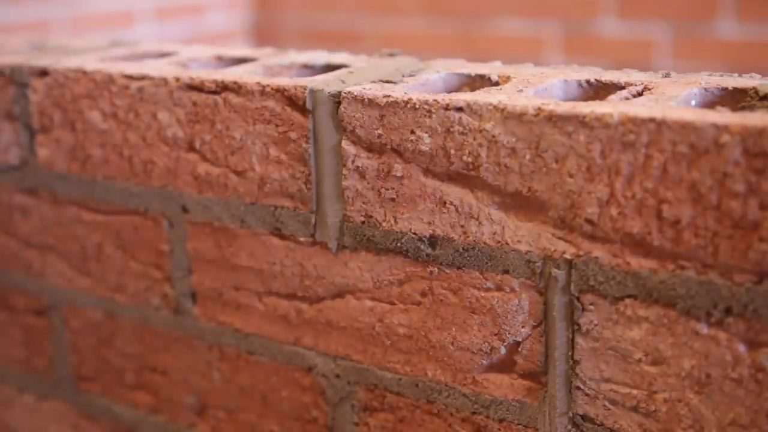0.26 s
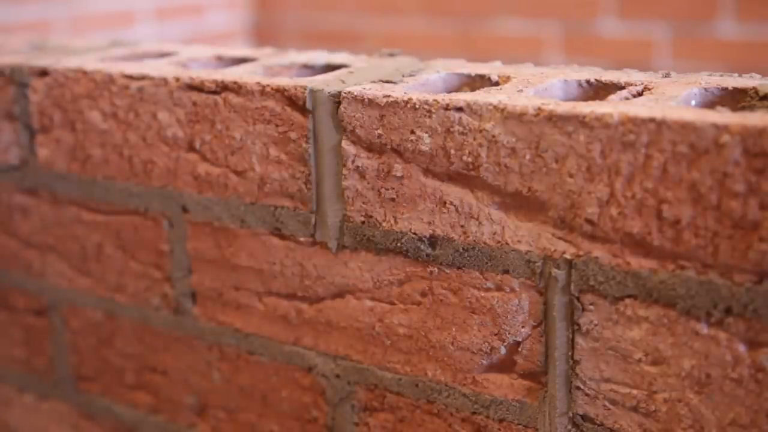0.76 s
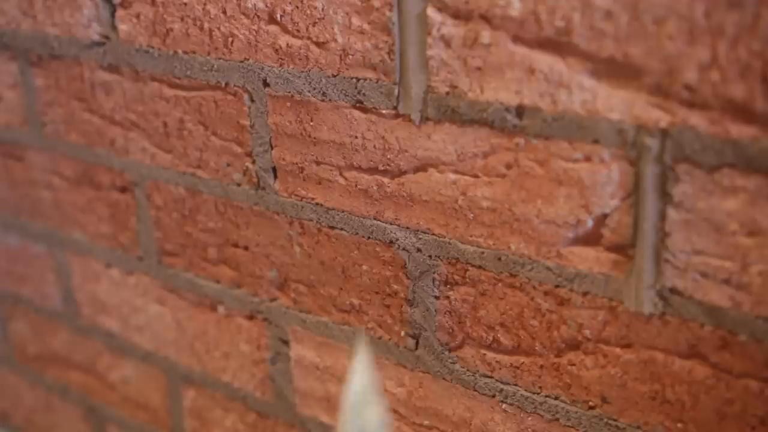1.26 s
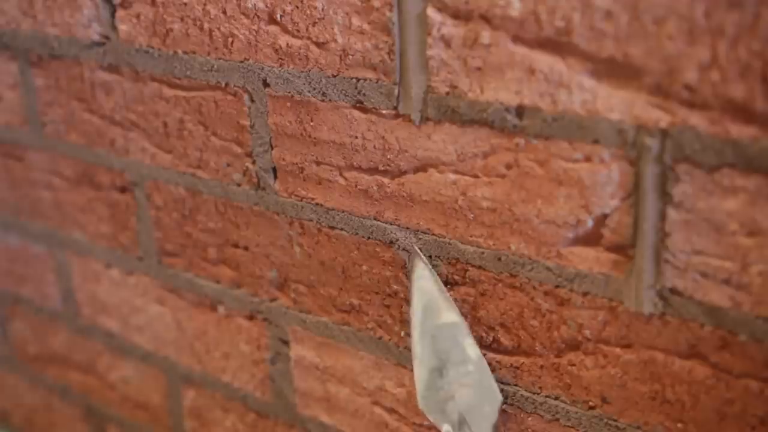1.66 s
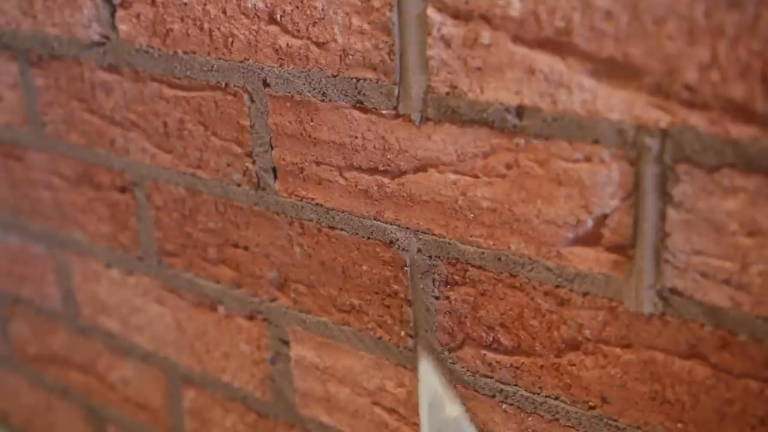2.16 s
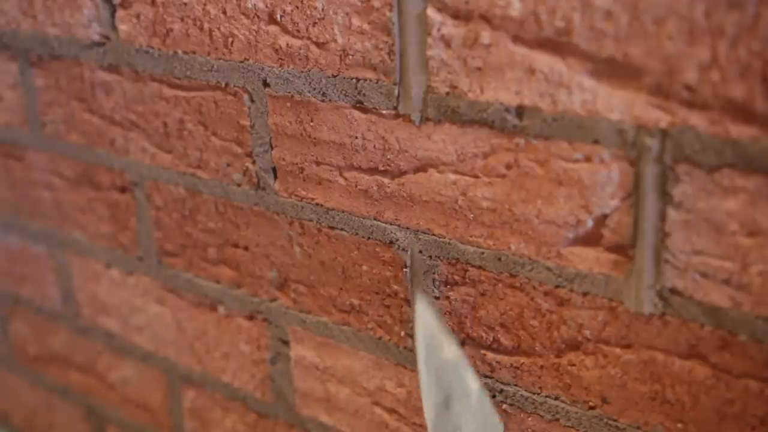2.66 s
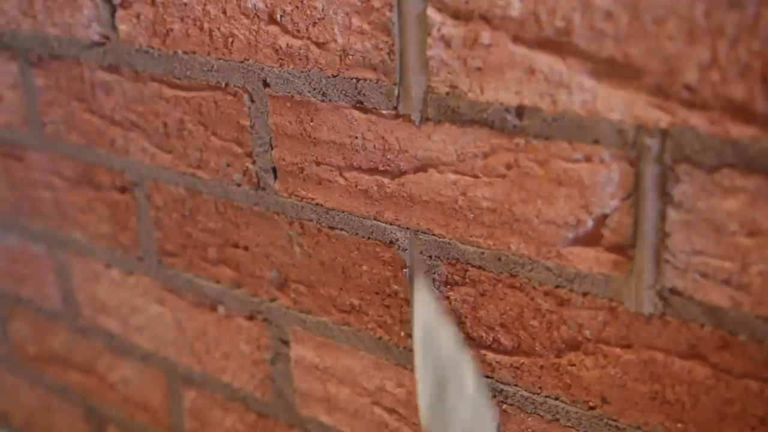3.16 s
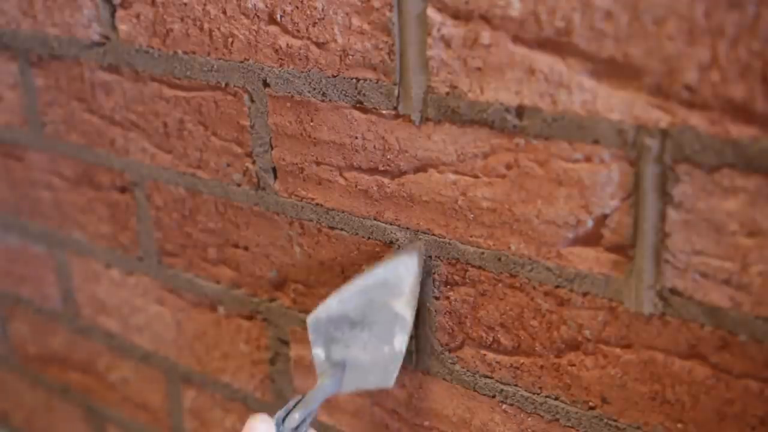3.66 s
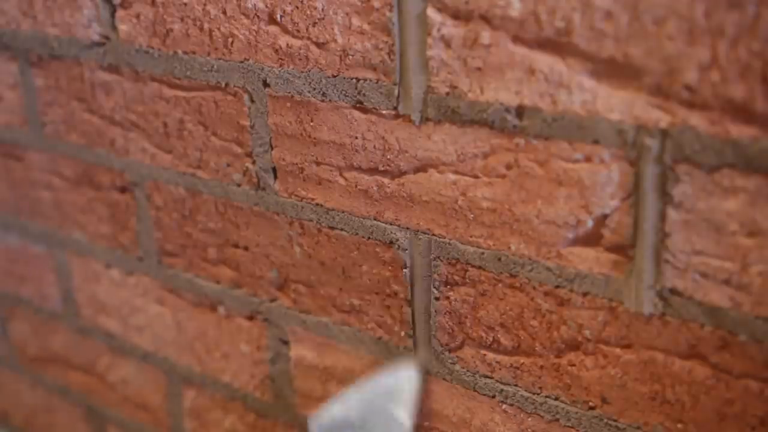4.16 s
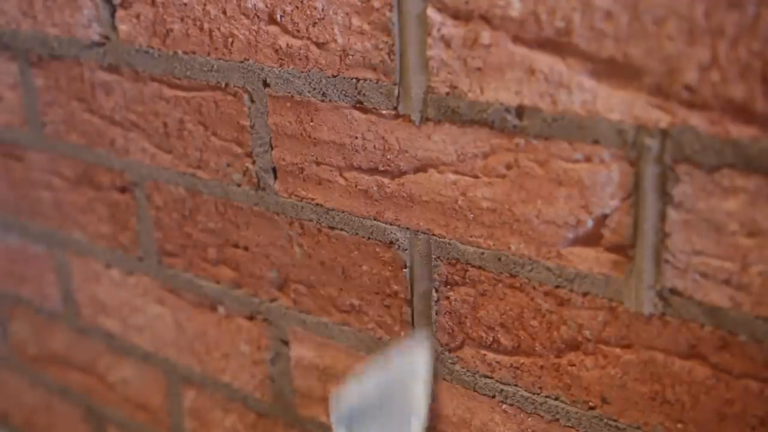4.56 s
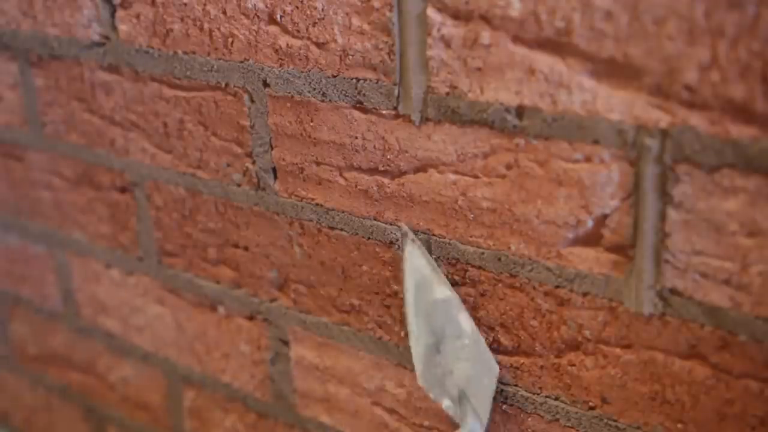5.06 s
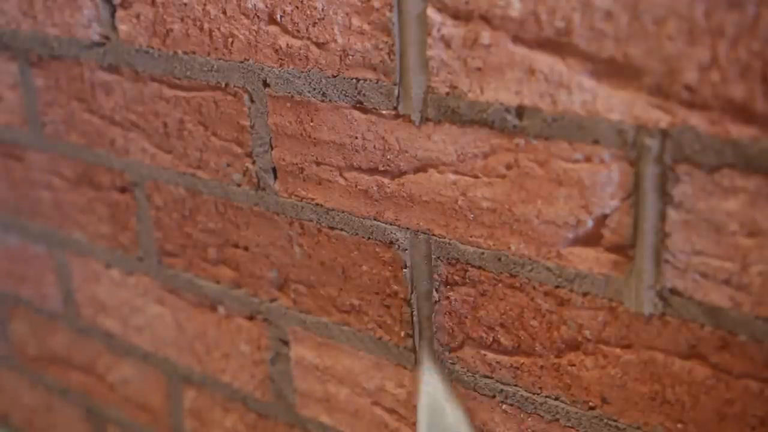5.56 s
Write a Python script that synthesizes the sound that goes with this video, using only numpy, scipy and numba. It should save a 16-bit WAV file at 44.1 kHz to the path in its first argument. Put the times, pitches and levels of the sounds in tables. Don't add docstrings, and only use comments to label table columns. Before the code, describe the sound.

Quiet, steady outdoor air with a very faint wavering engine hum runs throughout, wide in stereo. A sleeve rustles softly from 0.1 to 0.58 s. At 0.6 s a steel trowel taps a brick: a short hard clack with a dull thud, metallic ring and three rapid fading bounces until about 0.7 s. Crunchy crumbs tick from 0.74 to 1.4 s, with a faint distant metal clink and more cloth near 1.2 s. Six close scrapes follow, bright and sandy with thin steel ringing: 1.9-2.3 s, soft, swelling and fading, with two crumb ticks; 2.55-2.9 s, growing to a knock; 3.15-3.35 s, short, landing sharply and fading; 3.85-4.23 s, smoother and softer; 4.48-4.7 s, strongest, with rattling landing, snags and a loud clink near 4.69; 5.23-5.53 s, moderate, ending on a small rattle. Gaps hold only quiet air; the brick walls add a faint short tail.

```python
import sys
import numpy as np
from scipy import signal
from scipy.fft import rfft, irfft, next_fast_len
from scipy.io import wavfile
from numba import njit

SR = 44100
rng = np.random.default_rng(int(sys.argv[2]) if len(sys.argv) > 2 else 0)


def boost(x):
    u = np.asarray(x, float) / 20
    return 10 ** u


def transcribe(signal):
    frames = np.atleast_2d(signal).T
    limited = np.clip(frames, -1, 1)
    pcm = np.round(limited * 32767).astype(np.int16)
    wavfile.write(sys.argv[1], SR, pcm)


N = 257103

# [f/Hz, level per Hz/dB]
AIR = [(15, -53), (25, -26), (55, -14), (97, -9.5), (137, -5.5), (229, -8.5), (335, -5.5), (416, -8),
       (451, -9.5), (624, -9), (695, -8.5), (887, -8.5), (2550, -26), (2990, -26.5), (16000, -29)]
# [f/Hz, level per Hz/dB]
AIR_SIDE = [(15, -44), (25, -8), (200, -7), (354, -3.5), (394, -16.5), (451, -3.5), (575, -6), (2690, -8.5),
            (16000, -6)]
# [t/s, f/Hz, level/dB]
MOTOR = [(0, 118, -73), (.6, 138, -58), (1.2, 126, -69.5), (2.3, 116, -61), (2.6, 138, -61.5),
         (3.3, 122, -71), (3.9, 136, -59.5), (4.6, 128, -66.5), (5.03, 131, -54.5), (5.3, 130, -57),
         (5.83, 125, -72)]
# [peak t/s, level/dB, rise/(dB per s), fall/(dB per s)]
RUSTLES = [
    (.116, -57, 80, 62.5),
    (.31, -57, 220, 21),
    (.396, -50, 112, 201),
    (0.576, -55, 91, 900),
    (1.171, -55, 1200, 57.5),
    (1.244, -56, 98, 250),
    (1.34, -65.5, 100, 46),
]
# [f/Hz, level per Hz/dB]
CLOTH = [(180, -27), (300, -3.5), (946, -4.5), (1170, -8.5), (1810, -8), (3350, -11), (9710, -17.5),
         (16000, -26)]
# [t/s, peak level/dB, f/Hz]
CRUMBS = [(0.544, -63, 1450), (0.7435, -34, 2720), (0.773, -36, 1213), (0.813, -41, 5540),
          (0.841, -41.5, 5620), (0.9064, -47, 1220), (1.071, -42, 2260), (1.318, -42, 1330),
          (1.39, -52.5, 3470), (1.9582, -37, 1170), (1.9755, -38, 4500)]
# [f/Hz, level per Hz/dB]
THUD = [(71, -59), (120, 1.5), (580, 8), (1340, 10), (1500, 10.5), (1660, -50), (2230, -26), (2500, -39),
        (3250, -55), (5500, -120)]
# (low mode/dB, second mode/dB, grit/dB, deep modes/dB)
BLOW = (-33.5, -10, -14.5, -19)
SETTLE = (-25, -23, -31.5, -35)
FIRST_BOUNCE = (-15.5, -11.5, -21, -37.5)
# (start t/s, end t/s)
BOUNCING = (.598, .695)
# [f/Hz, level/dB, free t60/s, touching t60/s, share of the stiffening]
SHANK_MODES = [(641, -9, .9, .2, 0), (1382, -5, .22, .12, 0), (3472, -6, .2, .04, 0),
               (950, -4, .05, .04, 0), (515, -6, .06, .05, 0)]
DEEP_MODES = [(1382, -10, .3, .06, 0), (641, -8, .15, .04, 0), (480, -10, .04, .03, 0),
              (880, 1, .04, .03, 0), (1100, -3, .04, .03, 0), (1800, 1, .03, .025, 0),
              (2050, 1, .03, .025, 0)]
LOW_MODES = [(2540, -6, .025, .018, 0), (2806, 0, .19, .035, 1), (3472, -33, .26, .03, 0),
             (3060, -28, .06, .04, 0), (3000, -9, .03, .025, .3), (3250, -12, .03, .02, .3)]
SECOND_MODES = [(4425, 0, .15, .06, .2), (4300, -9, .03, .025, 0), (4520, -6, .06, .04, .2)]
HIGH_MODES = [(5015, -15, .2, .03, 0), (5745, -5, .09, .022, .1), (7890, -12, .08, .01, .4),
              (9990, -11, .05, .01, 0), (5300, -4, .025, .02, .3), (7300, -7, .015, .009, .4),
              (8300, -4, .015, .008, .3), (10600, -1, .015, .008, .2), (11750, -7, .012, .006, .1),
              (14300, -16, .01, .004, .1)]
# [f/Hz, level per Hz/dB]
GRIT = [(3500, -22.5), (4800, -1.5), (5800, 5.5), (6600, -7.5), (7600, -2), (10500, -0.5), (13000, -1),
        (15800, -4)]
# (f/Hz, level/dB, t60/s)
FAR_CLINK = (3467, -51.5, 0.93)
# [touch t/s, lift t/s]
STROKES = [
    (1.875, 2.275),
    (2.556, 2.893),
    (3.144, 3.334),
    (3.845, 4.23),
    (4.475, 4.708),
    (5.23, 5.534),
]
# [t/s, f/Hz]
PRESSED = [
    [(1.875, 2805), (2.285, 2825)],
    [(2.556, 2903), (2.81, 2804), (2.85, 3023), (2.9, 3061)],
    [(3.144, 2927), (3.336, 2803)],
    [(3.845, 2803), (4.235, 2771)],
    [(4.475, 3058), (4.641, 2808), (4.708, 2820)],
    [(5.23, 2938), (5.456, 2852), (5.543, 3042)],
]
# [t/s, drag level/dB]
DRAG = [
    [(1.92, -60.5), (2.01, -42.5), (2.118, -37), (2.242, -42), (2.285, -54.5)],
    [(2.575, -48), (2.639, -39), (2.845, -36)],
    [(3.19, -35), (3.25, -37), (3.316, -42.5), (3.33, -48.5)],
    [(3.86, -54), (3.917, -43.5), (4.101, -38.5), (4.187, -46), (4.22, -53.5)],
    [(4.52, -33.5), (4.564, -34.5), (4.668, -32.5)],
    [(5.28, -39), (5.31, -42.5), (5.467, -37.5), (5.51, -42)],
]
# [low mode re drag/dB, second mode re drag/dB]
BEARING = [
    (-5.5, 2),
    (-4.5, 1.5),
    (-6, -2.5),
    (-2.5, -4.5),
    (-3, -5),
    (-8, 0),
]
# [t/s, strength/dB, second mode re strength/dB, grit re strength/dB, loss per rebound/dB]
KNOCKS = [
    (1.8784, -40, 0.5, -16, 20),
    (2.5567, -27.5, 1, -19, 20),
    (2.859, -18.5, 11, -0.5, 9),
    (3.148, -10.5, 10, -5, 16),
    (3.3351, -22, -4, -17, 22),
    (3.8477, -34.5, -25, -14, 20),
    (4.4764, -8, -5, -14, 1.5),
    (4.6854, 1.5, -12.5, -20, 6),
    (5.2325, -17.5, 9, -16, 20),
    (5.5171, -16.5, 5, -4, 6.2),
]
# [t/s, strength/dB, second mode re
# strength/dB, grit re strength/dB]
SNAGS = [(2.6182, -33, 9, -8), (2.731, -31.5, 12.5, -7.5), (2.808, -32, -10.5, -2), (2.875, -19, 0.5, -1.5),
         (3.1706, -13.5, 6, -5.5), (3.242, -28, 12, 2), (4.5074, -20, -3.5, -1), (4.5345, -9.5, -6.5, -17),
         (4.5508, -29.5, -7.5, 2), (4.5616, -19, -10, -13), (4.587, -17.5, -7, -1), (4.617, -27, -20.5, -3),
         (4.6742, -10.5, -12.5, -8), (4.703, -10.5, -12, -5), (5.243, -21, -1, -16),
         (5.2674, -18, -11, -23.5), (4.223, -37, -14, -17)]


def coloured(x, points):
    hz, db = np.transpose(points)
    size = next_fast_len(N)
    grid = np.maximum(np.arange(size // 2 + 1) * SR / size, 1)
    gain = boost(np.interp(np.log(grid), np.log(hz), db))
    y = irfft(rfft(x, size) * gain, size)[:N]
    return y / np.std(y)


def in_time(rows, outside=None):
    s, *columns = np.transpose(rows)
    return [np.interp(np.arange(N) / SR, s, c, left=outside, right=outside) for c in columns]


def drift(rate):
    r = np.exp(-2 * np.pi * rate / SR)
    chance = rng.standard_normal(N // 16 + 2002)
    slow = signal.lfilter([1], [1, -2 * r ** 16, r ** 32], chance)[2000:]
    return np.interp(np.arange(N) / 16, np.arange(len(slow)), slow / np.std(slow))


def street():
    motor_hz, motor_db = in_time(MOTOR)
    air_db, fade_db_per_s = -54, 0.0042
    sway = boost(air_db - fade_db_per_s * np.arange(N) / SR + 0.21 * drift(0.64))
    mid = sway * coloured(rng.standard_normal(N), AIR)
    side = sway * boost(-7.5) * coloured(rng.standard_normal(N), AIR_SIDE)
    turning = 2 * np.pi * np.cumsum(motor_hz + 1.3 * drift(2.2)) / SR
    motor = boost(motor_db + 0.5 + 1.47 * drift(3.8)) * np.sin(turning)
    return mid + motor + side * np.array([[1], [-1]])


def grains(per_s, spread_db):
    sizes = boost(spread_db * np.minimum(rng.exponential(1, N), 5)) * rng.choice([-1, 1], N)
    clicks = sizes * (rng.random(N) < per_s / SR)
    return clicks / np.std(clicks)


def sleeve():
    t = np.arange(N) / SR
    power = np.zeros(N)
    for s, db, rise, fall in RUSTLES:
        power += boost(db - np.maximum(rise * (s - t), fall * (t - s))) ** 2
    return np.sqrt(power) * boost(3.0 + 1.0 * drift(37)) * coloured(grains(5000, 0.73), CLOTH)


def yard(x):
    t60_s, level_db, first_echo_s = 0.62, -25, .006
    t = np.arange(SR // 2) / SR
    mid, side = rng.standard_normal((2, len(t))) * boost(-60 * t / t60_s) * (t > first_echo_s)
    tails = signal.lfilter([.7], [1, -.3], [mid + 0.15 * side, mid - 0.23 * side])
    tails = tails / np.sqrt(np.sum(tails[0] ** 2))
    return boost(level_db) * signal.fftconvolve(x[None], tails, axes=1)[:, :N]


def crumbs():
    out, t = np.zeros(N), np.arange(SR // 2) / SR
    band = signal.butter(2, [1400, 6800], "band", fs=SR, output="sos")
    for s, db, hz in CRUMBS:
        at = round(s * SR)
        crunch = signal.sosfilt(band, rng.standard_normal(len(t)))
        tone = np.sin(2 * np.pi * hz * t)
        out[at:at + len(t)] += boost(db - 60 * t / 0.036) * (0.326 * tone + 0.63 * crunch)
    return out


def tap():
    blow_s, settle_s, bounce_s, gap_s, chatter_s = .5999, .6116, .628, .0273, .0016
    loss_db = np.array([9.5, 9.5, 9.5, 1])
    rows = [(blow_s, *BLOW), (settle_s, *SETTLE)]
    rows += [(bounce_s + k * gap_s, *(FIRST_BOUNCE - k * loss_db)) for k in range(3)]
    return [row + (chatter_s,) for row in rows]


def brick_thud():
    t = np.arange(N) / SR
    dull, sandy = np.zeros((2, N))
    for s, _, _, grit_db, deep_db, _ in tap():
        since = np.maximum(t - s, 0)
        dull += boost(deep_db - 1.0 - 720 * since) * (t >= s)
        sandy += boost(grit_db - 13.5 - 376 * since) * (t >= s)
    thud = dull * coloured(rng.standard_normal(N), THUD)
    thud += sandy * coloured(grains(9000, 3.0), CLOTH)
    return signal.sosfilt(signal.butter(4, 150, "high", fs=SR, output="sos"), thud)


def catches():
    rebound_s, dulling = .008, 1.5
    deep_db, deep_follows, snag_deep_loss_db, chatter_s = -34, 0.81, 2, .0029
    rows = []
    for s, db, second, grit, loss in KNOCKS:
        for k in range(3):
            weaker = second + k * dulling * min(second, 0)
            rows.append((s + k * rebound_s, db - k * loss, weaker, grit, 0))
    rows += [tuple(row) + (snag_deep_loss_db,) for row in SNAGS]
    return [(s, db, db + second, db + grit, deep_db + deep_follows * db - less, chatter_s)
            for s, db, second, grit, less in rows]


def bursts(events, column, power, fill):
    out = np.zeros(N)
    for row, inside in zip(events, fill):
        shape = np.exp(-np.arange(1500) / SR / row[5])
        at = round(row[0] * SR)
        size = np.sum(shape ** power) ** (1 / power)
        out[at:at + 1500] += boost(row[column]) * inside * shape / size
    return out


@njit
def resonate(force, chatter, turn, keep):
    out, state, swing = np.zeros(len(force)), 0j, 1 + 0j
    for i in range(len(force)):
        step = np.exp(1j * turn[i])
        swing *= step
        state = state * keep[i] * step + force[i] + chatter[i] * swing
        out[i] = state.imag
    return out


def steep_low_cut(x, hz):
    return signal.sosfilt(signal.cheby2(6, 35, hz, "high", fs=SR, output="sos"), x)


def patchy(x):
    size = next_fast_len(N)
    spectrum = rfft(x, size)
    place = 4 * np.log2(np.arange(1, size // 2 + 2) * SR / size / 3400)
    out = np.zeros(N)
    for k in range(10):
        piece = irfft(spectrum * np.clip(1 - abs(place - k), 0, 1), size)[:N]
        out += boost(2.8 * drift(20)) * piece
    return out


def crushed_sand(grit, sand, hits):
    cracks = boost(20.5) * bursts(hits, 3, 1.92, rng.standard_normal((len(hits), 1500)))
    duller = signal.butter(1, 10100, fs=SR, output="sos")
    crushing = boost(-2.5) * grit * sand + signal.sosfilt(duller, cracks)
    hiss = np.std(crushing) * patchy(coloured(crushing, GRIT))
    return steep_low_cut(hiss * boost(0.5), 3600)


def blade():
    low, second, grit, stiffening = np.zeros((4, N))
    touching = 0.58 * in_time([(BOUNCING[0], 1), (BOUNCING[1], 1)], outside=0)[0]
    for (touch, lift), (low_db, second_db), rows, pitches in zip(STROKES, BEARING, DRAG, PRESSED):
        on = in_time([(touch, 1), (lift, 1)], outside=0)[0]
        drag_db = in_time(rows)[0]
        low += on * boost(drag_db + low_db)
        second += on * boost(drag_db + second_db)
        grit += on * boost(drag_db)
        stiffening += on * (in_time(pitches)[0] / LOW_MODES[1][0] - 1)
        touching += on
    firmness, state = np.unique(touching, return_inverse=True)
    sand = grains(14000, 2.6) * boost(1.0 * drift(60))
    hits = catches() + tap()
    # (modes, rubbing force, blows, their column, blow level/dB, its spread/dB, silent below f/Hz)
    groups = [(SHANK_MODES, 0, tap(), 4, -3.0, 0, 200),
              (DEEP_MODES, low * boost(-27.0), catches(), 4, 0.1, 3, 200),
              (LOW_MODES, low * boost(-1.5), hits, 1, -2.0, 0, 2120),
              (SECOND_MODES, second, hits, 2, -2.0, 0, 3700),
              (HIGH_MODES, grit * boost(-12.5), hits, 3, -1.5, 4, 4300)]
    out = np.zeros(N)
    for modes, rub, blows, column, hit_db, spread_db, silent_hz in groups:
        ringing = np.zeros(N)
        for hz, db, free, pressed, share in modes:
            keep = boost(-60 / SR / (free * (pressed / free) ** firmness))[state]
            even = np.sqrt(2 * (1 - boost(-120 / SR / pressed)))
            reach = boost(1.5 * drift(15))
            wander = .011 * (grit > 0) * drift(15)
            rough = bursts(blows, column, 2.6, rng.standard_normal((len(blows), 1500)))
            force = reach * rub * sand * even + boost(hit_db - 5.5) * rough
            uneven = boost(spread_db * rng.standard_normal((len(blows), 1)))
            chatter = boost(hit_db) * bursts(blows, column, 0.95, uneven)
            turn = 2 * np.pi * hz * (1 + share * stiffening + wander) / SR
            ringing += boost(db) * resonate(force, chatter, turn, keep)
        out += steep_low_cut(ringing, silent_hz)
    return out + crushed_sand(grit, sand, hits)


def far_clink():
    out, t = np.zeros(N), np.arange(SR // 2) / SR
    hz, db, t60 = FAR_CLINK
    at = round(1.163 * SR)
    out[at:at + len(t)] = boost(db - 60 * t / t60) * np.sin(2 * np.pi * hz * t)
    return out


def scene():
    near = sleeve() + crumbs() + brick_thud() + blade() + far_clink()
    return near + yard(near) + street()


def roll_off(x):
    return signal.sosfilt(signal.butter(12, 16980, fs=SR, output="sos"), x)


def record(dry):
    rounded = 1.58 * np.tanh(dry / 1.43)
    top_cut = signal.cheby2(12, 30, 15900, fs=SR, output="sos")
    return roll_off(signal.sosfilt(top_cut, rounded))


dry = scene()
out = record(dry)
transcribe(out)
```